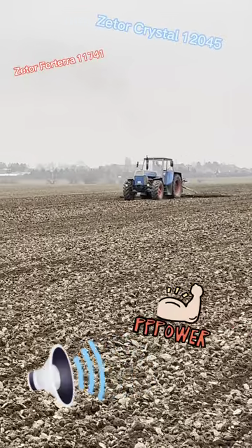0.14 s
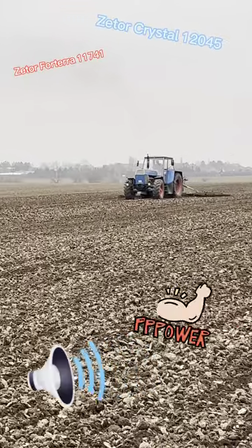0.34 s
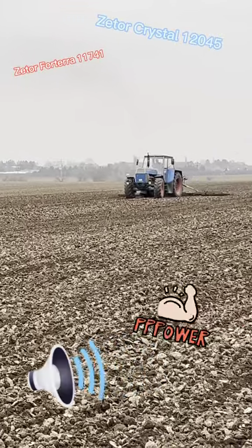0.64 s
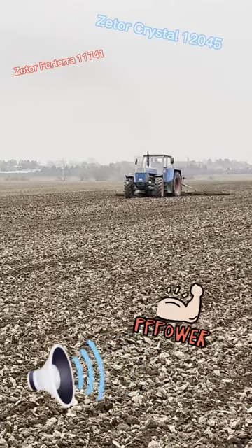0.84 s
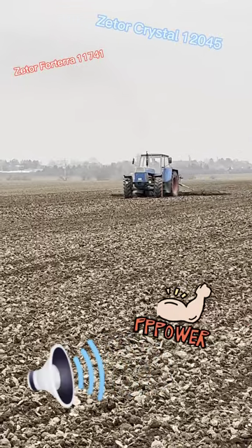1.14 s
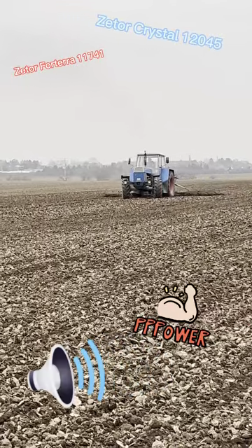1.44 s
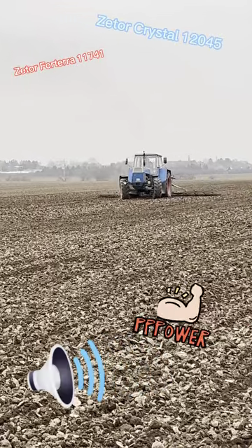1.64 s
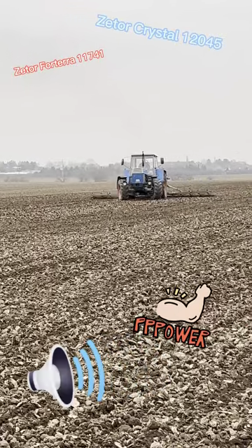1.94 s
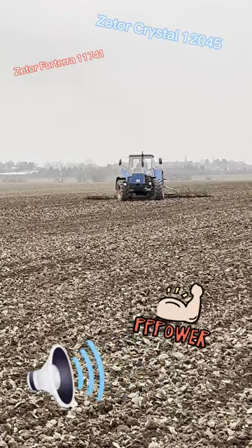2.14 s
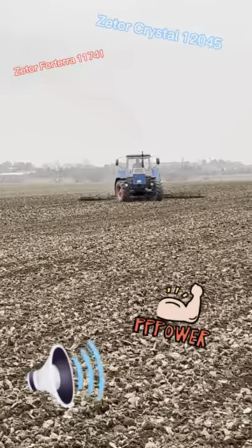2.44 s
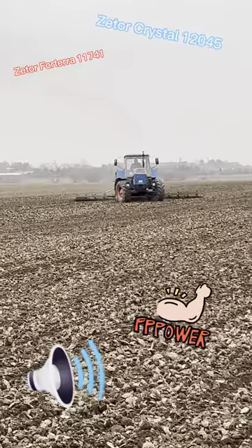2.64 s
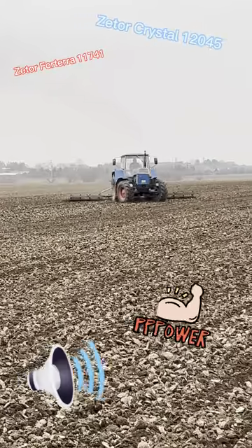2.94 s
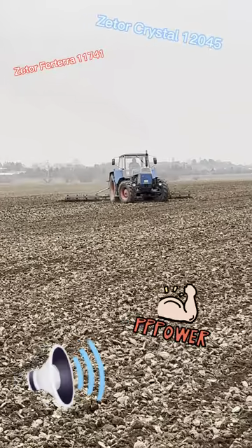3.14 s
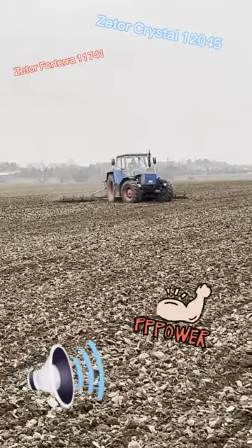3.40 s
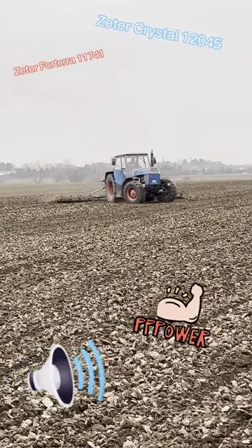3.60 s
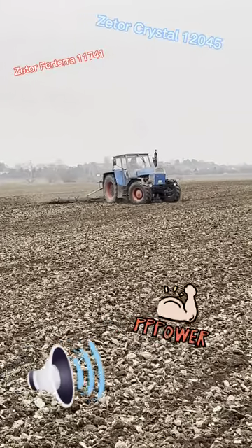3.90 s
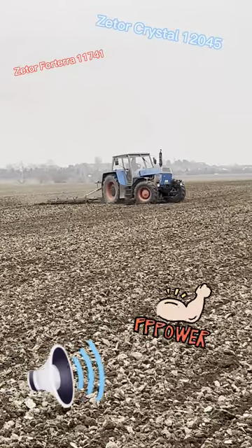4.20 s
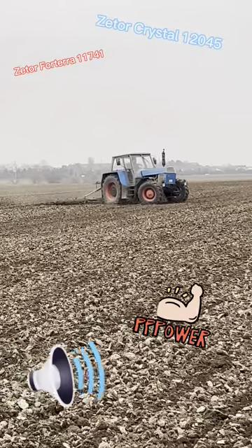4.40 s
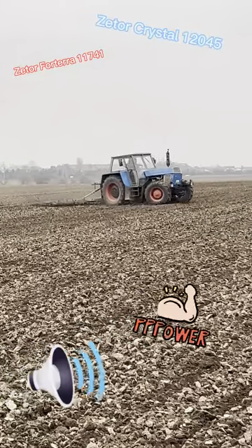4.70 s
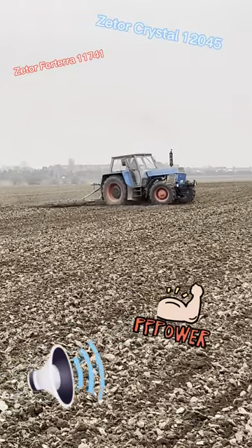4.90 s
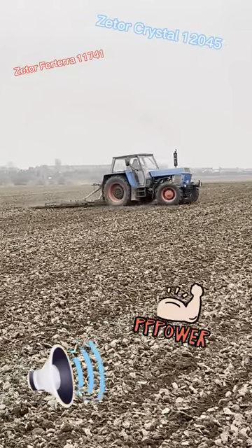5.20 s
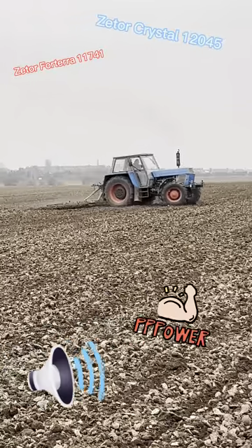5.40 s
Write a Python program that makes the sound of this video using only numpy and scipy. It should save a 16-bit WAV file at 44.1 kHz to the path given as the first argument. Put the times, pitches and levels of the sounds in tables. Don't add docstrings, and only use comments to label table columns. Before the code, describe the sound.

A diesel tractor is already running at full working speed when the sound begins and continues without a break for about 5.5 seconds. Its firing hum sits near 105 hertz, rising very slightly until about 3.2 seconds, then easing back. Over it lies a rough, knocking mid-range roar, strongest around one kilohertz. As the machine turns, the tone fills out; around 3.3 seconds, facing the listener, the exhaust is partly masked, then the drone returns stronger and is loudest with a harder bark near 5.4. Harrow tines hiss faintly in soil, with short gritty swells near 1.1, 2.3, 3.7 and 5.1 seconds, and more presence late on. A tiny stone knock comes at 2.7. Soft low air thumps puff irregularly, notably around 1.8 and 3.5. Open, dry field, distant stereo pickup with slightly different colour on each side, no extreme treble, and no final engine drop.

```python
import sys
import numpy as np
from scipy import signal
from scipy.fft import rfft, irfft, next_fast_len
from scipy.io import wavfile
from scipy.ndimage import uniform_filter1d, map_coordinates

SR = 44100
rng = np.random.default_rng(int(sys.argv[2]) if len(sys.argv) > 2 else 0)


def inscribe(sig):
    pcm = np.round(np.clip(np.atleast_2d(sig).T, -1, 1) * 32767)
    wavfile.write(sys.argv[1], SR, pcm.astype(np.int16))


def gain_from_db(level_db):
    decades = np.asarray(level_db, float) / 20
    return 10 ** decades


N = 244755
T_S = np.arange(N) / SR
HEAD_ON_S = 3.3


def unit(x):
    return x / np.sqrt(np.mean(x ** 2) + 1e-20)


def along(points, hz):
    f_hz, value = np.transpose(points)
    return np.interp(np.log(hz + 1), np.log(f_hz + 1), value)


def curves(rows):
    t_s, *columns = np.transpose(rows)
    return [np.interp(T_S, t_s, column) for column in columns]


def wobble(rate_hz):
    knots = rng.standard_normal(int(N * 40 / SR) + 4)
    return map_coordinates(knots, [T_S * min(rate_hz, 40)], order=1)


def swell(centre_s, length_s):
    return np.exp(-((T_S - centre_s) / length_s) ** 2)


def filtered(x, response):
    m = next_fast_len(N + SR // 4)
    return irfft(rfft(x, m) * response(np.fft.rfftfreq(m, 1 / SR)), m)[..., :N]


def patchy(x, patchy_db):
    z = signal.stft(x, nperseg=512)[2]
    field = uniform_filter1d(rng.standard_normal(z.shape[1:]), 5, 0)
    field = uniform_filter1d(field, 16, 1)
    return signal.istft(z * gain_from_db(patchy_db * unit(field)), nperseg=512)[1][:, :N]


def exhaust(cycle, firing_db):
    # order, level under firing/dB
    weak = [(2, -38), (4, -20.5), (5, -39), (7, -19), (8, -37), (10, -33), (11, -33), (15, -22.5),
            (18, -43), (21, -30), (24, -36.5), (27, -32), (31, -36.5), (33, -27), (36, -28), (48, -19.5),
            (66, -26), (96, -24.5)]
    # order, level under firing/dB, share of firing swell, wavering/dB, loss head-on/dB
    uneven = [(3, -11.5, 1, 1.6, 3.5), (9, -12.5, 0.59, 1.5, 0), (12, -28, 1, 2.5, 18),
              (16, -33.5, 0.16, 3, -4.5), (60, -20, 1, 2, -4.5), (72.1, -19, -1.5, 1, 2.5)]
    mean_db = firing_db.mean()
    hidden = swell(HEAD_ON_S, 0.71)
    bark_db = 9 * swell(5.43, 0.35)

    levels = [(6, firing_db)]
    for order, db, share, waver_db, lost_db in uneven:
        level_db = mean_db + db + share * (firing_db - mean_db) + waver_db * wobble(5) - lost_db * hidden
        levels.append((order, level_db + (order == 12) * bark_db))
    for order, db in weak:
        levels.append((order, 0.5 * (firing_db + mean_db) + db))

    out = 0
    for order, db in levels:
        start = rng.random() * (order != 6) - 0.25
        gain = gain_from_db(db + (1.17 + 0.041 * order) * wobble(4.06))
        phase = 2 * np.pi * (np.round(order) * cycle + start) + 0.014 * order * wobble(8)
        out = out + gain * np.sin(phase)
    return np.sqrt(2) * out


def beat(cycle, depth_db):
    cylinders_db = [0, 2.5, -1.5, 0, 3, 0.55]
    firing = 6 * cycle
    strength_db = np.asarray(cylinders_db)[firing.astype(int) % 6]
    return gain_from_db((depth_db + strength_db) * np.sin(np.pi * firing) ** 4)


def cyclic_noise(cycle):
    patterns = rng.standard_normal((8, 2500))
    heading = np.linspace(0, 6.99, N)
    side = heading.astype(int)
    place = (cycle % 1 * 2500).astype(int)
    blend = np.pi / 2 * (heading % 1)
    return np.cos(blend) * patterns[side, place] + np.sin(blend) * patterns[side + 1, place]


def block(cycle, roar_db):
    # f/Hz, density/dB
    roar_tone = [(300, -15.5), (420, -15), (700, -5.5), (1080, 0), (1700, -9.5), (2400, -16), (2850, -14),
                 (3850, -23.5), (5200, -23.5), (6600, -27.5), (8200, -32), (9800, -41), (14500, -48)]
    turned = 1 - np.exp(-T_S / 0.64)
    boom_db = 0.5 * swell(HEAD_ON_S, 1.2)
    strain_db = 0.19 * bites_near(9500)
    deep_db = 9.5 * turned + boom_db + 1.44 * wobble(3.64)
    bright_db = 4 * turned + strain_db + 0.7 * wobble(4.02)

    def share(hz):
        return along([(500, .38), (1100, .36), (2000, .18), (4000, 0)], hz)

    def colour(hz):
        return gain_from_db(along([(180, -40)] + list(roar_tone) + [(16000, -55)], hz))

    def above(hz, edge_hz):
        return 1 / (1 + (edge_hz / (hz + 1)) ** 6)

    noise = filtered(rng.standard_normal((2, N)), lambda hz: np.sqrt(1 - share(hz)))
    noise[0] += filtered(cyclic_noise(cycle), lambda hz: np.sqrt(share(hz)))
    noise = patchy(noise * beat(cycle, depth_db=1.0), patchy_db=0.91)

    deep = filtered(noise, lambda hz: colour(hz) * (1 - above(hz, 620)))
    bright = filtered(noise, lambda hz: colour(hz) * above(hz, 2300))
    roar = filtered(noise, colour) - deep - bright
    upper = filtered(roar, lambda hz: above(hz, 1100))
    tilt_db = 0.5 * np.tanh((1 - T_S) / 0.4)
    mix = gain_from_db(tilt_db) * upper + gain_from_db(-tilt_db) * (roar - upper)
    mix = mix + gain_from_db(deep_db - deep_db.mean()) * deep
    mix = mix + gain_from_db(bright_db - bright_db.mean()) * bright
    return gain_from_db(roar_db - 2.0) * mix / np.std(roar)


def clank():
    # t/s, peak/dB
    jolts = [
        (2.673, -8),
    ]
    out, t_s = np.zeros(N), np.arange(SR // 20) / SR
    for start_s, db in jolts:
        ring = gain_from_db(db - 6.5 - 60 * t_s / 0.013) * np.sin(2 * np.pi * 1150 * t_s)
        out[round(start_s * SR):][:len(t_s)] += ring
    return out


def bites_near(hz):
    # t/s, length/s, level/dB, f/Hz
    bites = [(.45, .1, 10.5, 7600), (1.0, 0.15, 11, 6000), (1.15, 0.15, 14.5, 8400),
             (2.002, 0.099, 4, 9500), (2.255, 0.32, 20.5, 7200), (2.45, 0.26, 17, 3200),
             (2.75, .14, 1.5, 9500), (3.0, .08, 5, 4200), (3.3, 0.093, 6.5, 11000), (3.78, 0.19, 16, 7200),
             (3.645, 0.17, 12, 3000), (4.2, 0.11, 8, 5600), (4.75, 0.22, 9.5, 5600),
             (4.896, 0.14, 8, 10000), (5.09, .12, 13.5, 6950), (5.35, .2, 7, 7800), (5.402, 0.22, 5, 4200)]
    spread = 0.26
    total_db = 0
    for centre_s, length_s, db, pitch_hz in bites:
        nearness = np.exp(-(np.log(pitch_hz / hz) / spread) ** 2)
        total_db = total_db + db * nearness * swell(centre_s, length_s)
    return total_db


def harrow(cycle):
    # f/Hz, width/Hz
    rings = [(4230, 900), (5360, 5800), (7560, 940), (11300, 5400), (3100, 1100)]
    # start/dB, approach/(dB/s), gain side-on/dB, wavering/dB
    sizzle = [(-63.5, 1.5, 13, 1), (-54.5, 0.82, 4, 1), (-66.5, 1.1, 2, 1.5), (-67.5, .3, 8, 0),
              (-57.5, 1, -5, 2)]
    side_on = 1 / (1 + np.exp((4.5 - T_S) / 0.46))
    out = 0
    for (start_db, rise_db_per_s, side_db, waver_db), (ring_hz, width_hz) in zip(sizzle, rings):
        db = start_db + rise_db_per_s * T_S + side_db * side_on
        db = db + bites_near(ring_hz) + waver_db * wobble(5.3)
        grit = patchy(rng.standard_normal((2, N)) * beat(cycle, depth_db=4), patchy_db=5.0)
        ring = filtered(grit, lambda hz: 1 / (1 + (2 * (hz - ring_hz) / width_hz) ** 2) ** 2)
        out = out + gain_from_db(db - 8.0) * unit(ring)
    return out


def air():
    # f/Hz, density/dB
    air_tone = [(15, -27), (30, -9), (50, -1), (75, 4), (125, -1.5), (180, -8), (240, -21), (400, -19),
                (700, -47), (1500, -120)]
    # t/s, length/s, level/dB
    gusts = [
        (.2, .1, 2.5),
        (.95, 0.3, 2),
        (1.8, 0.13, 4),
        (3.008, 0.26, -0.5),
        (3.5, 0.17, 4.5),
    ]
    level_db = -40 + 0.1 * T_S
    for centre_s, length_s, db in gusts:
        level_db = level_db + db * swell(centre_s, length_s)
    lumps = gain_from_db(level_db) * unit(gain_from_db(2.7 * wobble(14)))
    return lumps * unit(filtered(rng.standard_normal((2, N)), lambda hz: gain_from_db(along(air_tone, hz))))


def ports(pair):
    # f/Hz, left minus right/dB
    lean = [(350, 0), (560, 3), (760, 1.5), (950, 5.5), (1150, 11.8), (1400, 7.5), (1650, 1.5), (1900, 1.9),
            (2300, .1), (2550, -.7), (3200, 0)]
    # f/Hz, left lead/rad
    lead = [(0, -.17), (350, -.15), (480, 0), (630, -.25), (1000, .35), (1350, -.35), (1800, 1.3),
            (2050, 1), (2600, 2.3), (3800, .8), (4600, 1.4), (5150, 1.45), (5870, 3.14), (7900, 6.28),
            (9000, 7.1), (10200, 9.42), (12400, 12.57), (14700, 15.7)]
    # f/Hz, likeness
    alike = [(40, .96), (105, .97), (190, .75), (400, .97), (2000, .95), (4000, .85), (5300, .85),
             (5900, .97), (7000, .8), (7900, .97), (9000, .8), (10300, .95), (14000, .9)]

    def turn(hz):
        return np.arccos(np.clip(along(alike, hz), 0, 1)) / 2

    def half(hz):
        return gain_from_db(along(lean, hz) / 2) * np.exp(0.5j * np.interp(hz, *np.transpose(lead)))

    common, apart = filtered(pair, lambda hz: np.array([np.cos(turn(hz)), np.sin(turn(hz))]))
    both = np.array([common + apart, common - apart])
    return filtered(both, lambda hz: np.array([half(hz), 1 / half(hz)]))


def scene():
    # t/s, firing order level/dB, block and bonnet roar level/dB
    engine = [(0.0, -29.5, -31), (0.31, -30, -32), (0.8, -30, -32), (1.2, -27.5, -32.5), (1.8, -29, -33),
              (2.2, -29.5, -32), (2.72, -27.5, -30.5), (3.2, -27.5, -31.5), (3.35, -30, -31.5),
              (3.6, -27.5, -31), (3.95, -27, -29.5), (4.2, -26, -29), (4.6, -27, -29.5), (5.0, -25.5, -29),
              (5.46, -23.5, -29.5), (5.55, -23.5, -29)]
    # t/s, firing rate/Hz
    speed = [(0.0, 104.5), (0.3, 104.1), (1.17, 104.25), (1.75, 105.0), (2.63, 105.6), (3.21, 106.8),
             (3.6, 106.3), (4.67, 105.5), (5.55, 105.75)]
    firing_db, roar_db = curves(engine)
    cycle = np.cumsum(curves(speed)[0]) / SR / 6
    field = block(cycle, roar_db) + harrow(cycle) + air() * gain_from_db([[0], [4]])
    field[0] += exhaust(cycle, firing_db) + clank()
    return ports(field * np.minimum(np.arange(N) / 100, 1))


def top_cut(x):
    return signal.sosfilt(signal.butter(12, 15200, fs=SR, output="sos"), x)


def record(dry):
    return top_cut(dry)


dry = scene()
out = record(dry)
inscribe(out)
```